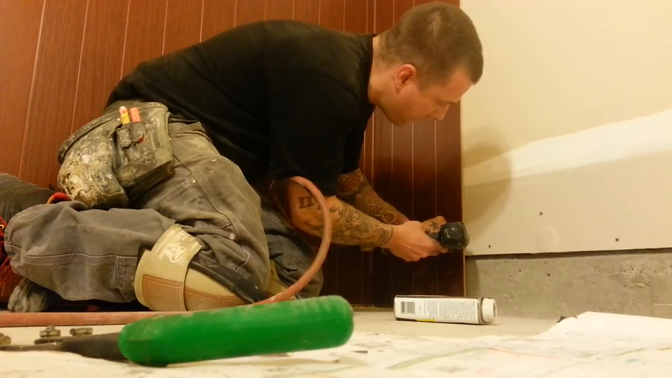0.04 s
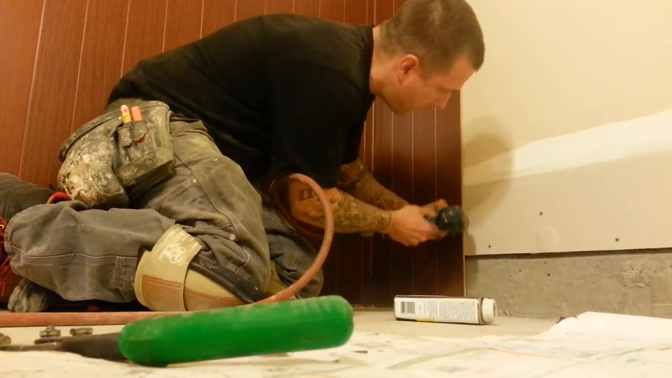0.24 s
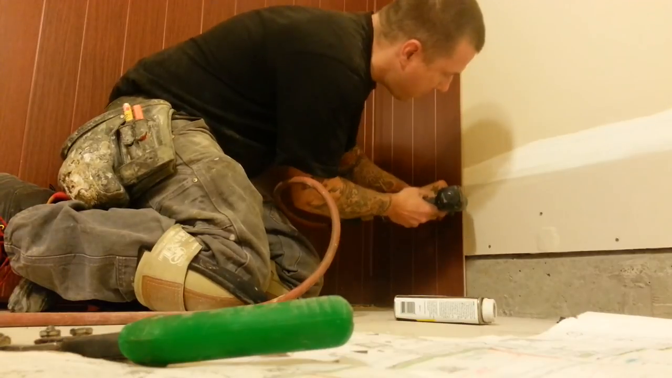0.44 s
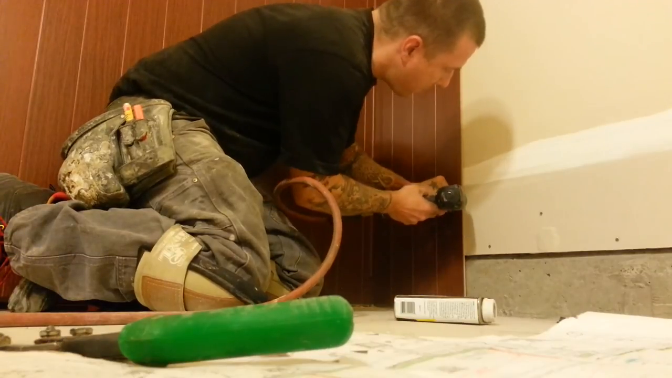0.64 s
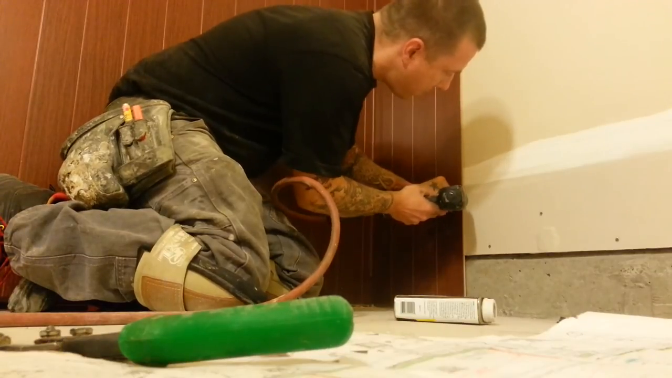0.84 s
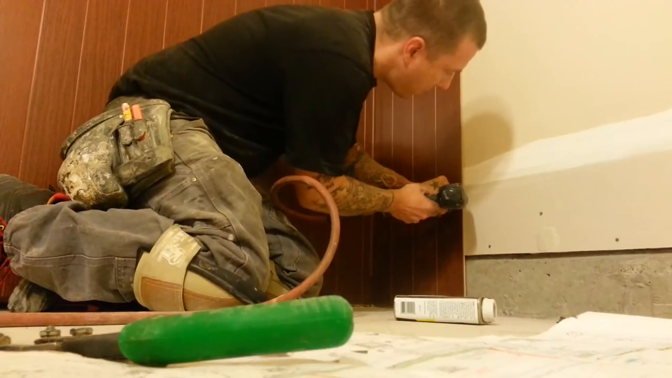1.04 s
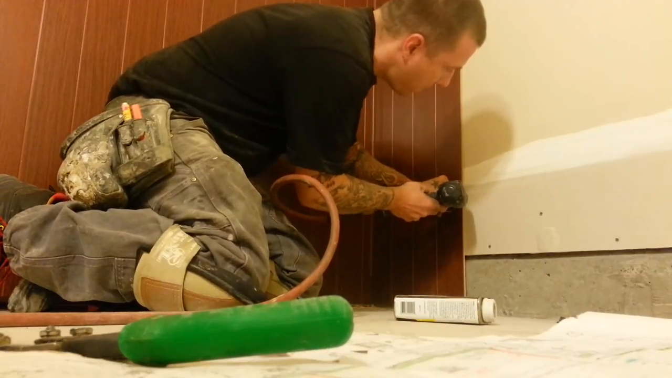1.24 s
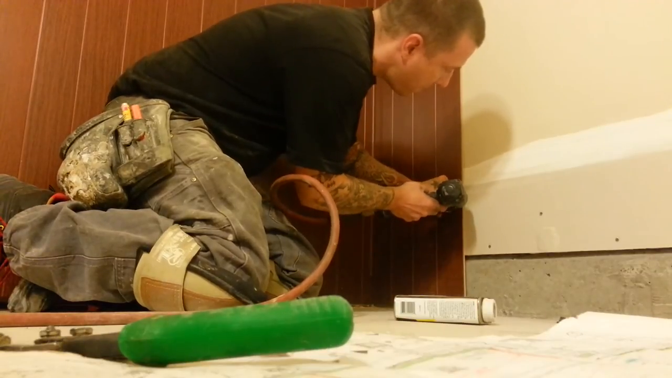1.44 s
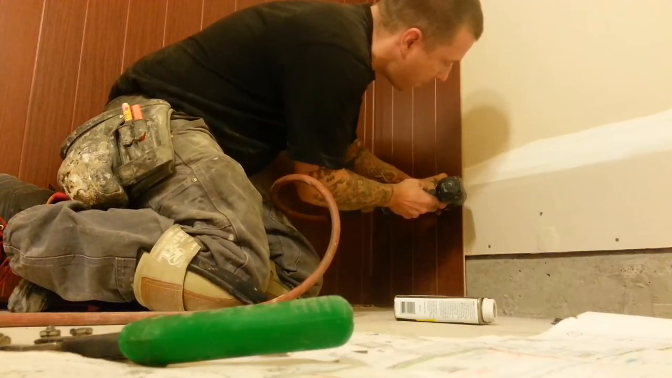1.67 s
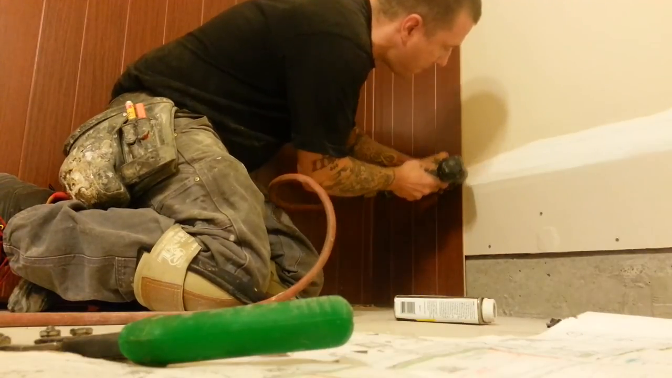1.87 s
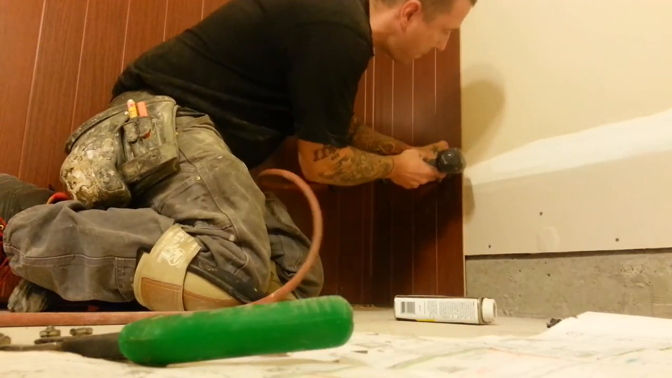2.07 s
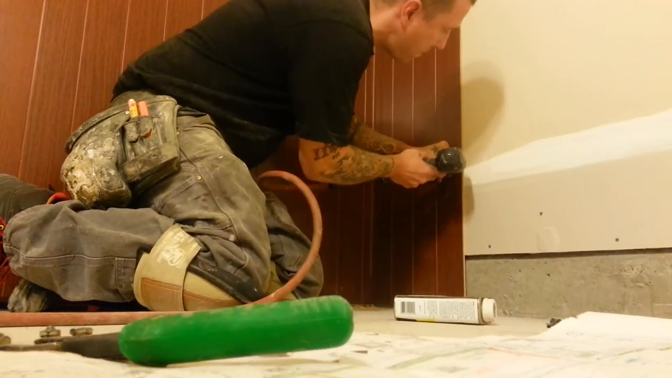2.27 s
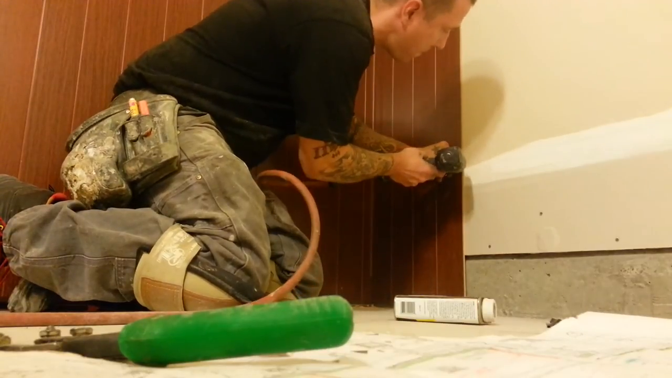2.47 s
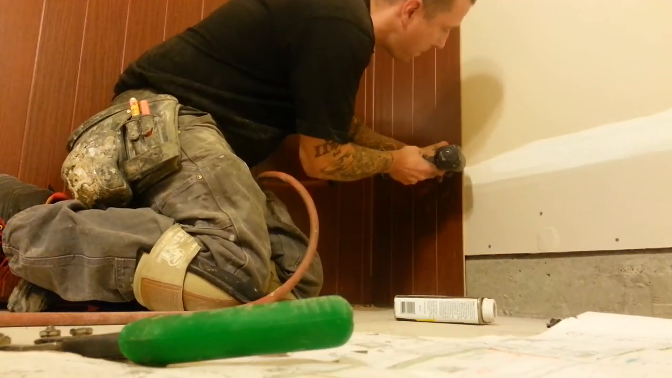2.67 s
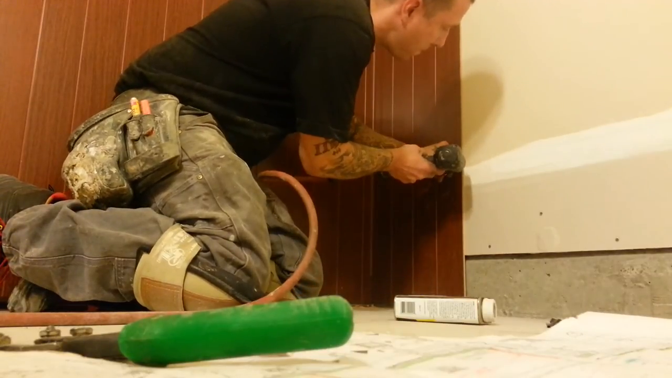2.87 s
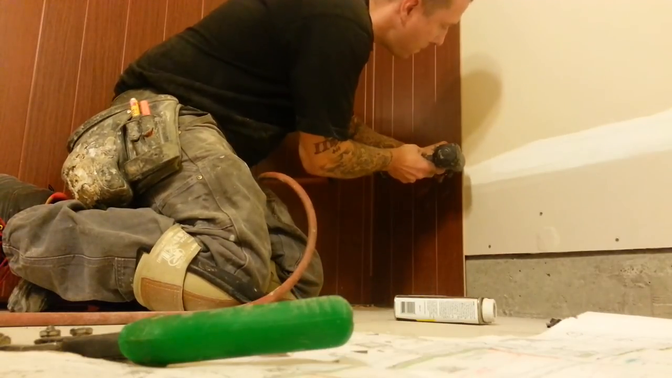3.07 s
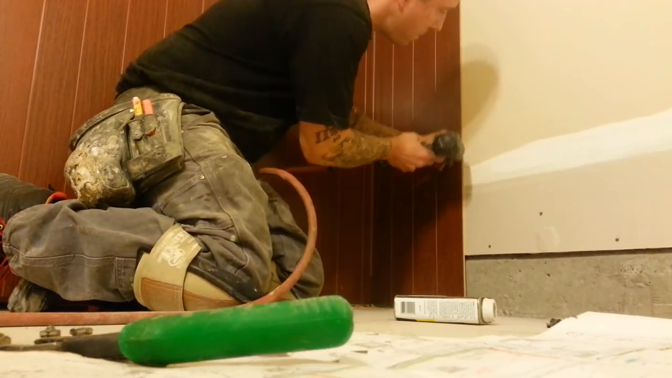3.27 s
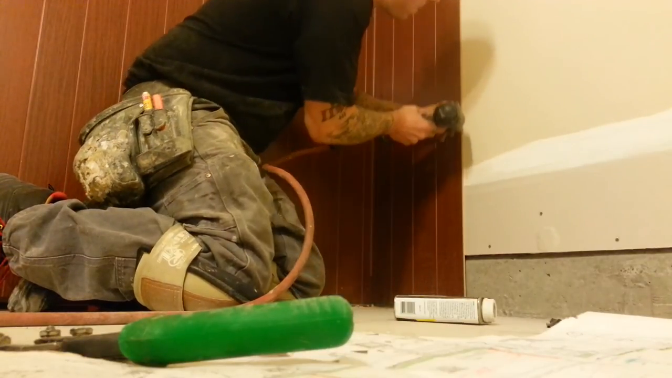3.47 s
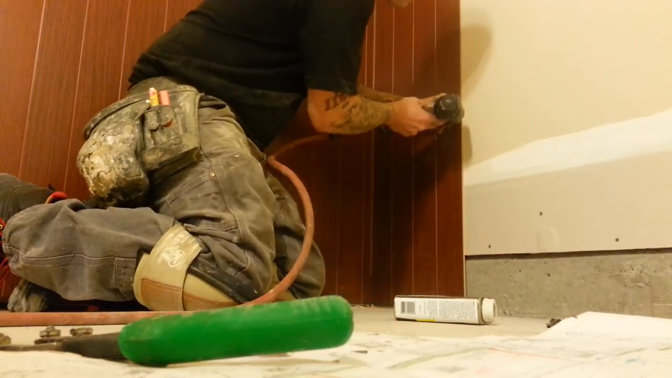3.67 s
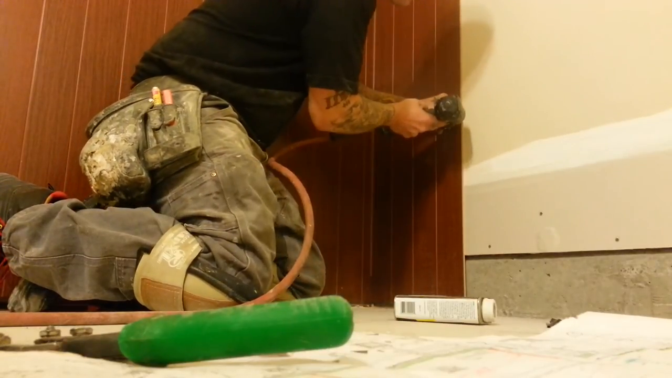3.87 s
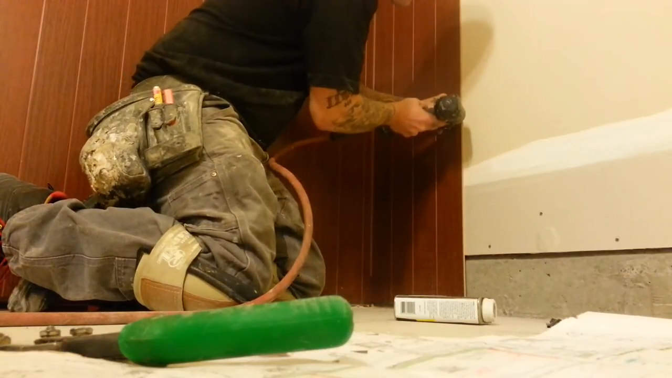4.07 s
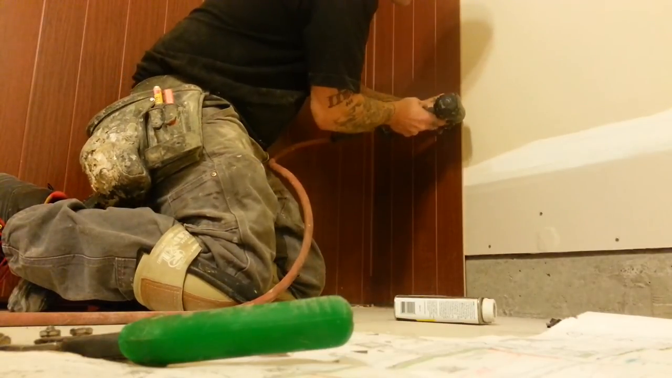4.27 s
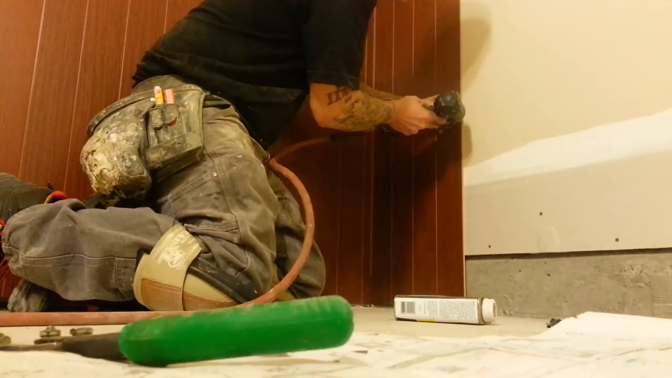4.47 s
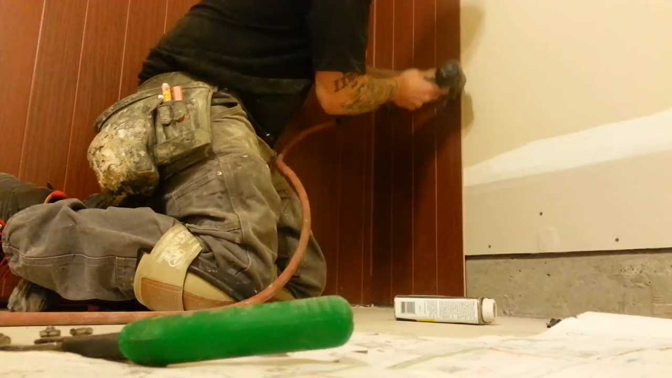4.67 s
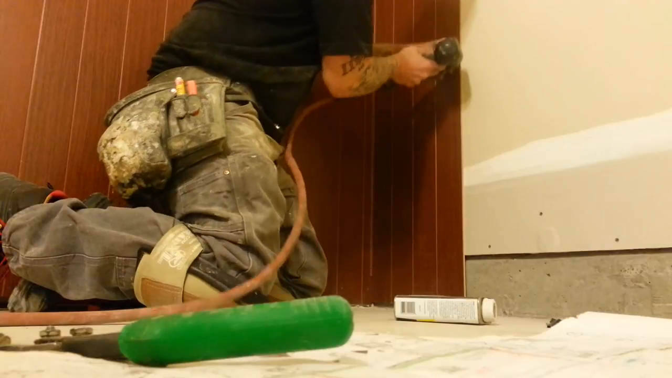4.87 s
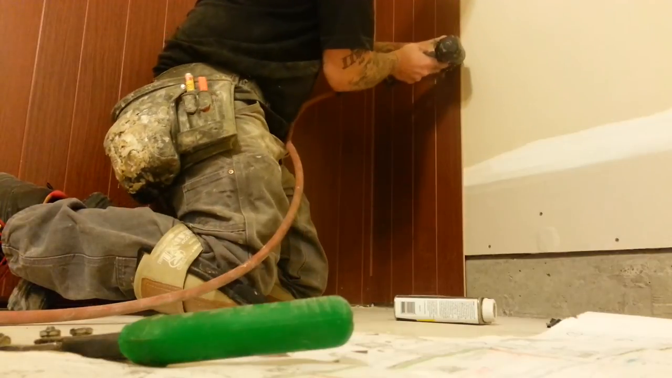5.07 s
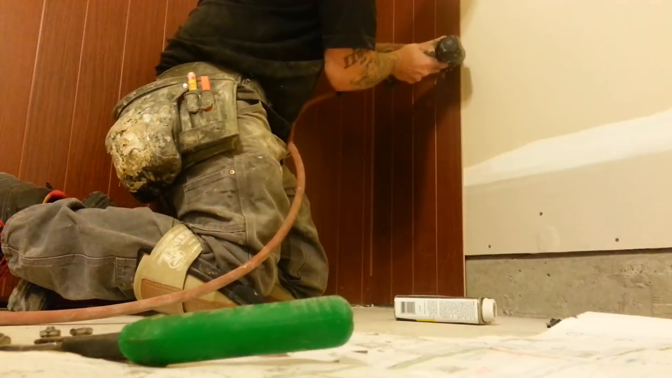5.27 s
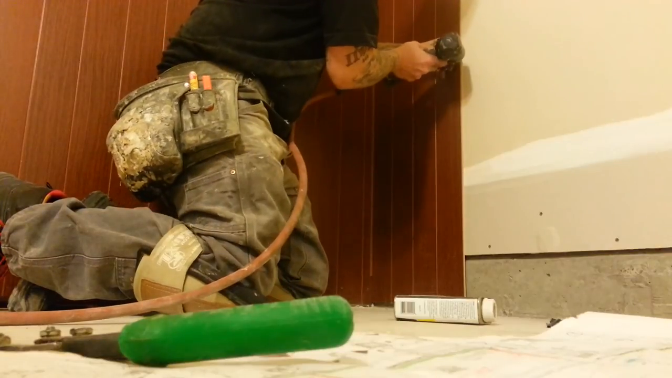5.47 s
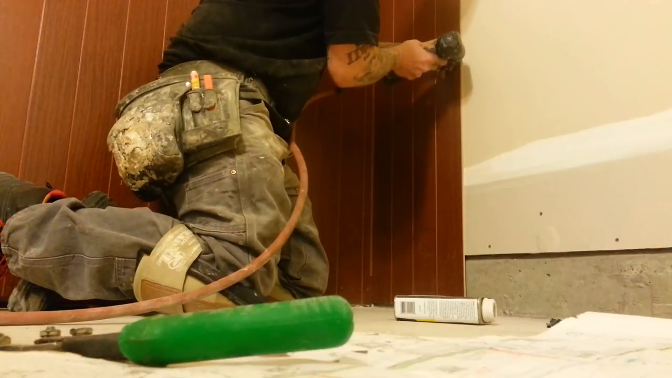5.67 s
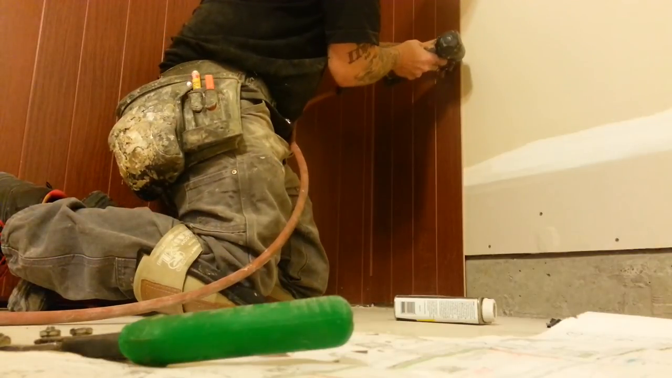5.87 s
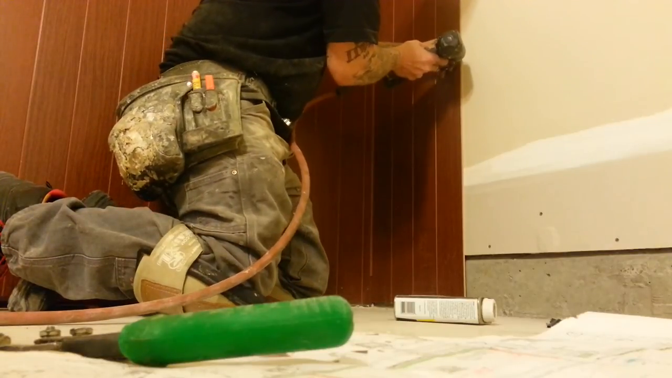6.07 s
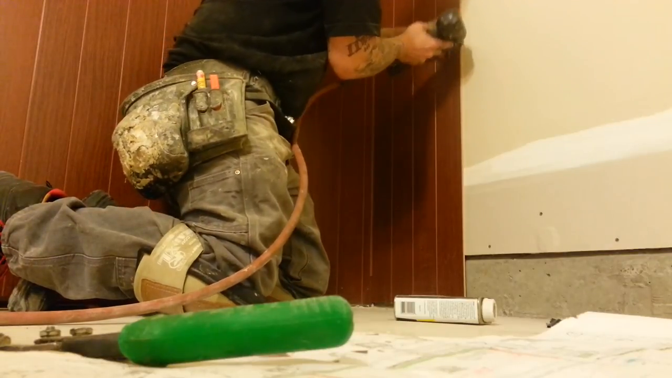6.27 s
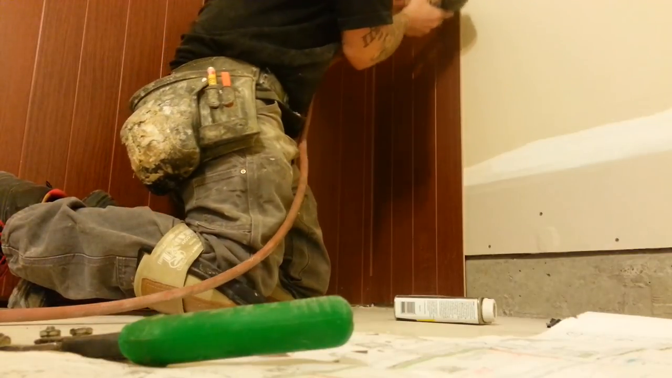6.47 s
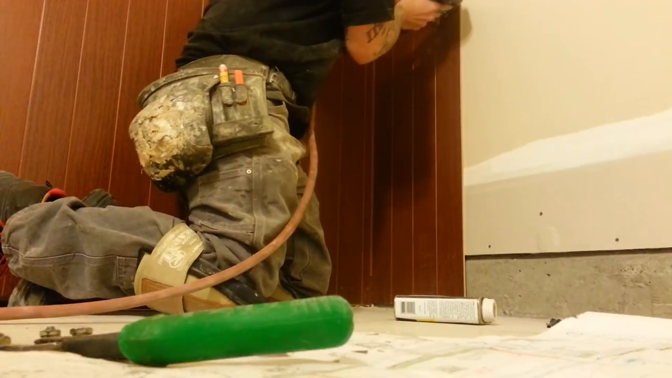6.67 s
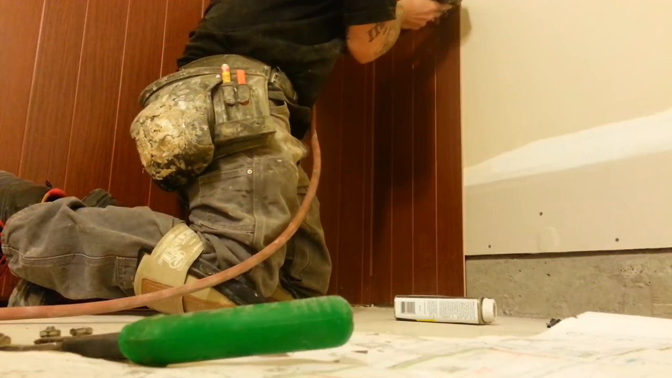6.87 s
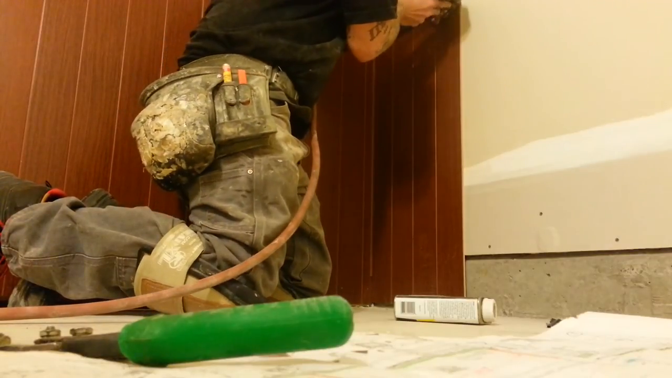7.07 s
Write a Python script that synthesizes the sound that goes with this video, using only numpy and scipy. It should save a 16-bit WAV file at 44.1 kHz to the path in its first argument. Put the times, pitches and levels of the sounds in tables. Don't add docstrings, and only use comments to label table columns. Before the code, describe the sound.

Five loud pneumatic nail gun cracks hit hollow paneling about a second and a half apart, spent air blasting out, soft thuds and hisses between.

```python
import sys
import numpy as np
from scipy import signal
from scipy.fft import rfft, irfft
from scipy.io import wavfile
from scipy.ndimage import uniform_filter1d

SR = 44100
rng = np.random.default_rng(int(sys.argv[2]) if len(sys.argv) > 2 else 0)


def master_out(mix):
    frames = np.transpose(np.atleast_2d(mix))
    ceiling = np.clip(frames, -1, 1)
    pcm = np.round(ceiling * 32767).astype(np.int16)
    wavfile.write(sys.argv[1], SR, pcm)


def how_loud(loudness_db):
    steps = np.asarray(loudness_db, float) / 20
    return 10 ** steps


N = 314433
LEAD = SR // 10

# (time [s], level [dB], t60 [s])
EXHAUSTS = [
    (0.132, -2.5, 0.33),
    (1.66, -1, 0.26),
    (3.207, -1, 0.26),
    (4.589, -1, 0.26),
    (6.235, -1.5, 0.26),
]
# (frequency [Hz], level [dB per Hz])
EXHAUST_AIR = [(59, -43.5), (100, 3.5), (864, -6), (1430, -1), (3030, 1), (3370, 0), (3980, -0.5),
               (4610, 3.5), (8280, -3.5), (14000, -3.5), (14900, -21)]
# (time [s], peak [dB], knock [dB], second landing [dB])
FLOOR_THUDS = [
    (.928, -31, -11.5, -5.5),
    (2.151, -33.5, 1, 6.5),
    (3.861, -24, -16, -2.5),
    (5.186, -20.5, -13.5, -2.5),
    (5.571, -28.5, -14, -4),
    (6.77, -18, -12, -2.5),
]


def at_hz(points, hz):
    table = np.array(points)
    return np.interp(np.log(hz + 1), np.log(table[:, 0]), table[:, 1])


def since(s):
    return (np.arange(N + LEAD) - LEAD) / SR - s


def dying(s, rise, t60):
    t = np.maximum(since(s), 0)
    return np.minimum(t / rise, 1) * how_loud(-60 * np.minimum(t / t60, 4))


def air(spectrum, length=N + LEAD):
    shape = how_loud(at_hz(spectrum, np.fft.rfftfreq(length, 1 / SR)))
    noise = irfft(rfft(rng.standard_normal(length)) * shape, length)
    return noise / noise.std()


def ring(x, hz, t60):
    radius = how_loud(-60 / (t60 * SR))
    w = 2 * np.pi * hz / SR
    return signal.lfilter([0, np.sin(w)], [1, -2 * radius * np.cos(w), radius * radius], x + 1e-18)


def strike(times, levels_db, modes, spread_db):
    at = np.round(np.array(times) * SR).astype(int) + LEAD
    chance = rng.standard_normal((len(at), len(modes)))
    out = 0
    for k, (hz, db, t60) in enumerate(modes):
        clicks = np.zeros(N + LEAD)
        clicks[at] = how_loud(np.array(levels_db) + db + spread_db * chance[:, k])
        out = out + (-1) ** k * ring(clicks, hz, t60)
    return out


def blows():
    # (time [s], panel ring [dB], wall boom [dB], metal crack [dB], thump [dB])
    hits = [
        (-.04, 5, 10, 7.5, 9),
        (1.5418, 8, -0.5, 9, 10),
        (3.0621, 13.5, -6.5, 7.5, 9.5),
        (4.4206, 13.5, 5, 7.5, 11),
        (6.063, 1.5, -3, 6.5, 10),
    ]
    # (time [s], level [dB])
    knocks = [(0.17, -5), (1.64, -2), (1.695, -12), (3.144, -7), (3.241, -3.5), (3.272, -4.5),
              (4.559, -8.5), (4.62, -1), (4.666, -12), (6.109, -4), (6.27, -1)]
    # (frequency [Hz], level [dB], t60 [s])
    panel = [(1160, -1.5, 0.0087), (1460, -4.5, 0.015), (1651, 0, 0.012)]
    # (frequency [Hz], level [dB], t60 [s])
    wall = [(203.3, -4.5, 0.039), (320, -12, 0.035), (468, -5.5, 0.045), (676.4, -10, 0.014)]
    # (frequency [Hz], level [dB], t60 [s])
    gun = [(2560, -2.5, .008), (2470, -4.5, 0.0048), (3700, -9, 0.0054), (4753, -9, .006),
           (5547, -3, 0.024), (6440, -10, 0.0054)]
    # (frequency [Hz], level [dB per Hz])
    thump_air = [(18, -40), (30, -14.5), (87, -9), (246, 0), (280, -2), (677, 0), (833, -4.5), (1590, 4),
                 (2010, -5.5), (2610, -1.5), (5400, -15), (11800, -30), (14900, -38.5)]

    s, panel_db, boom_db, crack_db, thump_db = np.transpose(hits)
    bottom_s = s + 0.0038
    thump = air(thump_air) * sum(how_loud(db) * dying(t, 0.0058, 0.12) for t, db in zip(s, thump_db))
    crack_gain = sum(how_loud(db - 5.5) * dying(t, 0.00025, 0.15) for t, db in zip(bottom_s, crack_db))
    crack = air(EXHAUST_AIR) * crack_gain
    metal = strike(bottom_s, crack_db - 1.0, gun, spread_db=3)
    wood = strike(s, panel_db, panel, spread_db=6.5) + strike(s, boom_db, wall, spread_db=2.5)
    shifting = strike(*np.transpose(knocks), panel + wall, spread_db=2.0)
    return wood + shifting + metal + thump + crack


def exhaust():
    # (frequency [Hz], level [dB])
    hollows = [
        (1180, -.5),
        (1520, -14),
        (1000, -9),
        (1080, -8),
        (1150, -2),
    ]

    jet, out = air(EXHAUST_AIR), 0
    for (s, db, t60), (hz, hollow_db) in zip(EXHAUSTS, hollows):
        hollow = ring(ring(jet, hz, .011), hz, .011)
        speaking = np.clip(since(s) / .03, 0, 1)
        puff = how_loud(-2.0) * dying(s, 0.0022, 0.035)
        flow = dying(s, 0.0043, t60) + puff
        out = out + how_loud(db) * flow * (jet + how_loud(hollow_db) * speaking * hollow / hollow.std())
    return out


def valve():
    # (start [s], end [s], level [dB])
    leaks = [
        (1.493, 1.541, -15),
        (2.983, 3.066, -18),
        (4.324, 4.406, -17),
        (6.024, 6.066, -12),
    ]
    # (frequency [Hz], level [dB per Hz])
    hiss = [(100, -30.5), (200, -14.5), (350, -24), (1200, -21.5), (1800, -19.5), (2300, -4.5), (2750, -1),
            (3300, -7.5), (7000, -9), (13400, -11), (14900, -6)]

    opening = 0
    for start, end, db in leaks:
        swell = np.clip(since(start) / .013, 0, 1) ** 3
        choke = np.clip(-since(end) / .01, 0, 1)
        opening = opening + how_loud(db) * swell * choke
    return opening * air(hiss)


def thuds():
    # (frequency [Hz], level [dB], t60 [s])
    slab_modes = [(61.4, 5, 0.2), (86, -1, 0.24), (106, -3.5, 0.24), (128.7, -6, .15), (147, -7, 0.23),
                  (168, -2.5, 0.14), (211.3, -9, 0.19), (278, -7, 0.087)]

    s, db, knock_db, again_db = np.transpose(FLOOR_THUDS)
    knock = air([(40, 0), (150, -0.5), (600, -7.5), (3000, -40.5), (9000, -61)])
    knock = knock * sum(how_loud(a + b) * dying(t, .01, 0.25) for t, a, b in zip(s, db, knock_db))
    slab = strike(s, db - 12.5, slab_modes, spread_db=1.5)
    slab = slab + strike(s + 0.024, db + again_db - 9.0, slab_modes, spread_db=0.5)
    padded = signal.butter(2, [48, 300], "band", fs=SR, output="sos")
    return signal.sosfilt(padded, slab) + knock


def touches():
    # (time [s], peak [dB], scuff t60 [s])
    contacts = [
        (1.383, -54, 0.15),
        (1.484, -60, 0.026),
        (4.1983, -63, .05),
    ]
    # (frequency [Hz], level [dB], t60 [s])
    nose = [(2996, -2, 0.0089), (5320, -4, 0.013), (5550, 1, 0.03)]

    s, db, t60 = np.transpose(contacts)
    scuff = air([(100, -4.5), (2000, -12.5), (3000, -1), (4200, -13.0), (5400, 4.5), (7000, -6.5), (14000, -15.0)])
    scuff = scuff * sum(how_loud(a) * dying(t, 0.0033, d) for t, a, d in zip(s, db, t60))
    return strike(s, db + 2, nose, spread_db=-6) + scuff


def press():
    # (time of most load [s], level [dB], build-up [dB per s])
    loads = [
        (1.28, -59, 90),
        (1.39, -56, 50),
        (1.5, -56.5, 59.5),
        (2.988, -50.5, 66),
        (4.31, -50.5, 350),
        (4.42, -47, 280),
        (6.039, -43, 1001.5),
    ]
    let_go = 199

    load = 0
    for s, db, rate_db in loads:
        t = since(s)
        load = load + how_loud(db + np.where(t < 0, rate_db * t, -let_go * t))
    return load * air([(30, -13), (100, -6), (250, -3), (450, -11.5), (1000, -31.5), (4000, -60.0)])


def pair(noises, hz):
    # (frequency [Hz], left-right likeness [0 to 1])
    likeness = [(60, 0.86), (130, 0.88), (290, 0.75), (630, 0.5), (1380, -0.03), (3010, 0.07), (6590, -0.0),
                (14400, -0.01)]
    # (frequency [Hz], left minus right [dB])
    left_more = [(60, -5.5), (110, 7), (200, 0), (370, 2), (690, 1.5), (1260, 0.5), (2320, 0), (4270, -7.5),
                 (7850, -10), (14400, 4.5)]

    alike = np.clip(at_hz(likeness, hz), 0, 1)
    mid, side = rfft(noises)
    both = np.sqrt(1 + alike) * mid + np.sqrt(1 - alike) * side * [[1], [-1]]
    return both * how_loud(at_hz(left_more, hz) * [[.5], [-.5]]) / np.sqrt(2)


def room(x, wet_db):
    # (frequency [Hz], t60 [s])
    room_t60 = [(40, 0.66), (120, 0.39), (300, 0.87), (1000, 0.99), (2500, 0.99), (5000, 0.82),
                (8000, 0.67), (11000, 0.49), (14500, 0.44)]
    # (frequency [Hz], level [dB], t60 [s])
    standing = [(64.6, -26.5, 1), (105.7, -31, 0.98), (182.7, -28, 0.73), (212, -27, 0.83)]

    length = 2 * SR
    hz, t = np.fft.rfftfreq(length, 1 / SR), np.arange(length) / SR
    diffuse, tail = pair(rng.standard_normal((2, length)), hz), 0
    for centre in 30 * 2 ** np.arange(0, 9.6, .5):
        band = np.cos(np.pi * np.clip(np.log2((hz + 1) / centre), -.5, .5)) ** 2
        tail = tail + irfft(diffuse * band, length) * how_loud(-60 * t / at_hz(room_t60, centre))
    tail = tail + sum(how_loud(db - 60 * t / t60) * np.sin(2 * np.pi * f * t) for f, db, t60 in standing)
    tail = how_loud(wet_db) * tail * np.clip((t - .001) / 0.0016, 0, 1)
    tail[0, 0], tail[1, 1] = how_loud(-2.4), how_loud(3.0)
    return signal.fftconvolve(x[None], tail, axes=1)[:, LEAD:LEAD + N]


def hush():
    # (frequency [Hz], level [dB per Hz])
    hush_air = [(12, -45), (20, -13.5), (27, -20.5), (86, -7), (191, -3.5), (219, -9), (297, -4),
                (322, -10.5), (918, -21), (2100, -24), (9530, -35), (14400, -33)]
    # (start [s], end [s], level [dB])
    motor = [
        (1.2, 2.5, -86),
        (2.56, 3.1, -76),
        (4.1, 4.4, -93),
        (5.6, 6.1, -92),
    ]

    noises = np.array([air(hush_air, N), air(hush_air, N)])
    noise = irfft(pair(noises, np.fft.rfftfreq(N, 1 / SR)), N)
    whine = ring(rng.standard_normal(N), 1461, .8)
    spells = 0
    for start, end, db in motor:
        spells = spells + how_loud(db) * np.clip(np.minimum(since(start), -since(end)) / .05, 0, 1)
    return how_loud(12) * (how_loud(-64) * noise + spells[LEAD:] * whine / whine.std())


def scene():
    small = thuds() * how_loud(3.5) + touches() * how_loud(7.0) + press()
    in_room = valve() + blows() + exhaust() + small * how_loud(-5)
    return room(in_room, wet_db=-29) + small[LEAD:] + hush()


def smooth(x, seconds):
    r = np.exp(-1 / (seconds * SR))
    return signal.lfilter([1 - r], [1, -r], x, zi=[r * x[:200].mean()])[0]


def sag(s, delay, fall, hold, climb, depth_db):
    t = since(s + delay)[LEAD:]
    return depth_db * np.clip(np.minimum(t / fall, 1 - (t - fall - hold) / climb), 0, 1)


def limiter_db(power):
    release = 100 * np.arange(N) / SR
    held_db = np.maximum.accumulate(10 * np.log10(smooth(power, .005)) + release) - release
    return smooth(np.minimum(-12 - held_db, 0), 0.0027)


def late_db():
    # (time [s], extra [dB], length [s], duck [dB])
    slips = [
        (0.137, 9, 0.027, 0.2),
        (1.544, 12, 0.04, -4.5),
        (1.673, 7.5, 0.0098, -6.5),
        (3.0662, 11.5, 0.028, -2.5),
        (3.238, 2, 0.018, -4.5),
        (4.4203, 7.5, 0.0047, -9),
        (4.593, 4.5, 0.011, -9),
        (6.0627, 6.5, 0.01, -10),
        (6.238, 10.5, 0.028, -2),
    ]
    early, fall, climb = .006, 0.029, 0.043

    t, out = np.arange(N) / SR, 0
    for s, db, length, duck_db in slips:
        out = out + db * (t >= s) * np.clip(1 - ((t - s) / length) ** 2, 0, 1)
        out = out + sag(s, -early - fall, fall, 0, climb, duck_db)
    return out


def slow_db():
    # (delay [s], fall [s], hold [s], climb [s], depth [dB])
    after_exhaust = (0.12, 0.31, 0.2123, 0.5851, -7)
    # (delay [s], fall [s], hold [s], climb [s], depth [dB])
    after_thud = (.0, 0.15, 0.06, 0.02, -1)

    exhaust_db = sum(sag(row[0], *after_exhaust) for row in EXHAUSTS)
    return exhaust_db + sum(sag(row[0], *after_thud) for row in FLOOR_THUDS)


def starve_top(x):
    # (frequency [Hz], level against the whole sound [dB])
    starved_below = [(9000, -56), (10500, -45.5), (12500, -39.5), (14500, -36.5)]

    hz, _, frames = signal.stft(x, SR, nperseg=2048)
    power = np.mean(np.abs(frames) ** 2, axis=0) + 1e-16
    band_db = 10 * np.log10(uniform_filter1d(power, size=6, axis=0))
    whole_db = 10 * np.log10(power[hz > 600].sum(axis=0))
    relief_db = 2.5 * np.maximum(-28.5 - whole_db, 0)
    luck = rng.standard_normal((len(hz) // 12 + 1, power.shape[1])).repeat(12, axis=0)[:len(hz)]
    demand_db = at_hz(starved_below, hz)[:, None] - relief_db + 4 * luck
    kept = 1 / (1 + np.exp(np.clip(1.4 * (whole_db + demand_db - band_db), -30, 30)))
    frames = frames * np.where(hz[:, None] > 9000, kept, 1)
    return signal.istft(frames, SR, nperseg=2048)[1][:, :N]


def low_pass(x):
    return signal.sosfilt(signal.butter(12, 15030, fs=SR, output="sos"), x)


def record(dry):
    dry = signal.sosfilt(signal.butter(2, 45, "high", fs=SR, output="sos"), dry)
    power = np.mean(dry ** 2, axis=0) + 1e-12
    gate_db = np.clip(.8 * (10 * np.log10(smooth(power, 0.0089)) + 34), -14, 0)
    gain_db = limiter_db(power) + gate_db + late_db() + slow_db()
    x = np.clip(dry * how_loud(gain_db), -1, 1)
    x = signal.sosfilt(signal.butter(1, 20, "high", fs=SR, output="sos"), x)
    x = signal.sosfilt(signal.cheby2(16, 45, 14950, fs=SR, output="sos"), x)
    finished = starve_top(x)
    return low_pass(finished)


dry = scene()
out = record(dry)
master_out(out)
```